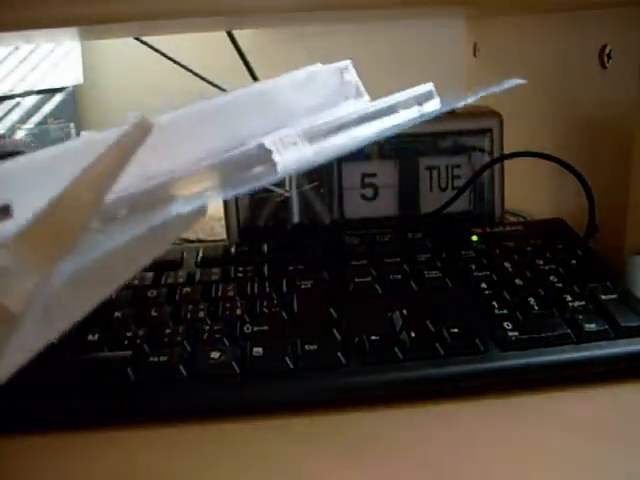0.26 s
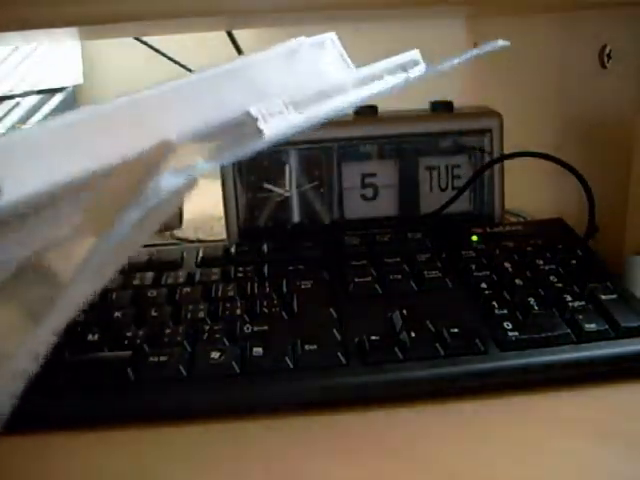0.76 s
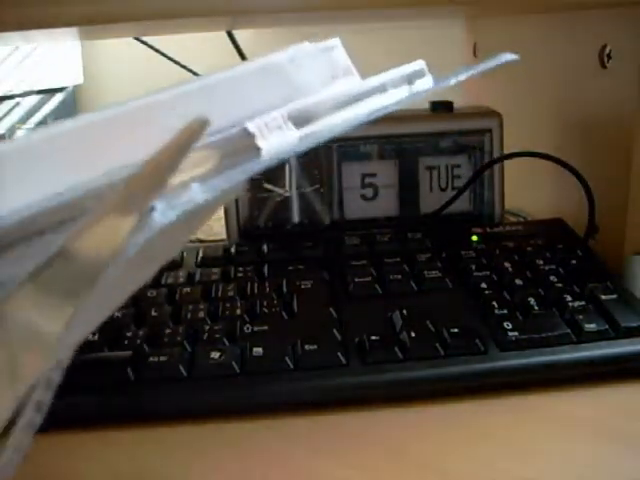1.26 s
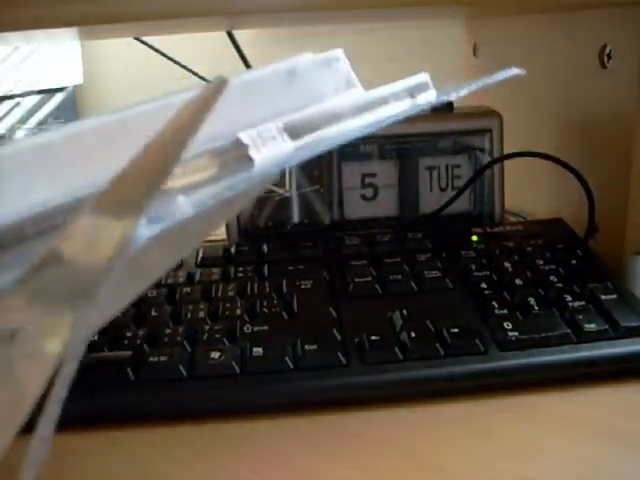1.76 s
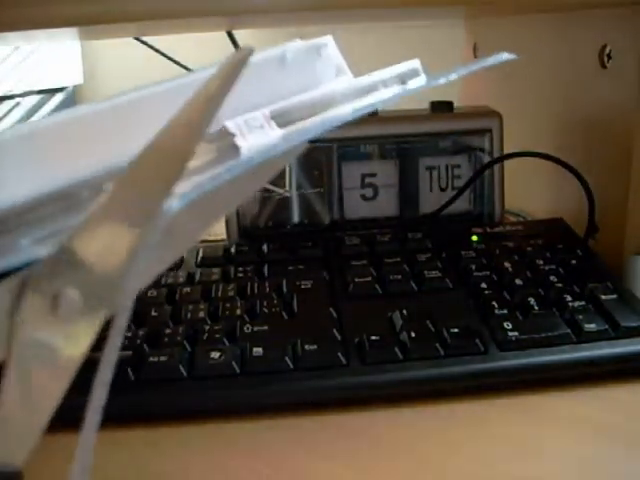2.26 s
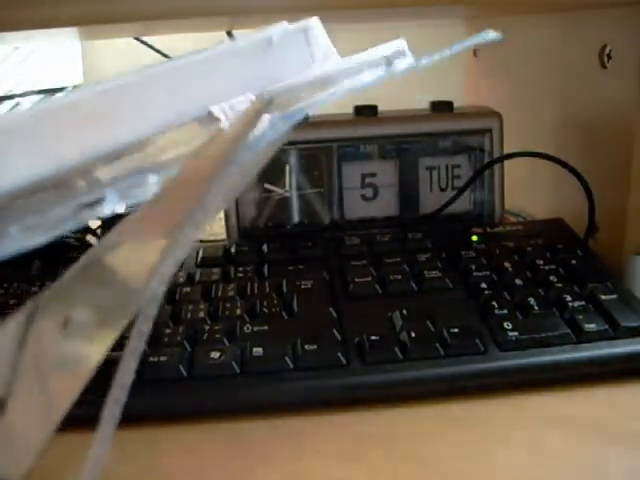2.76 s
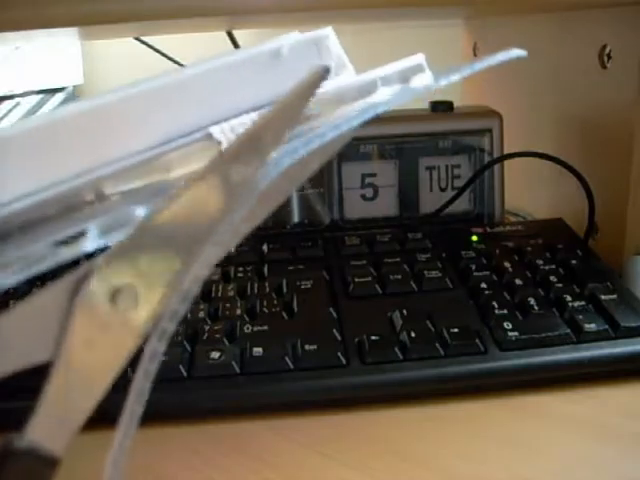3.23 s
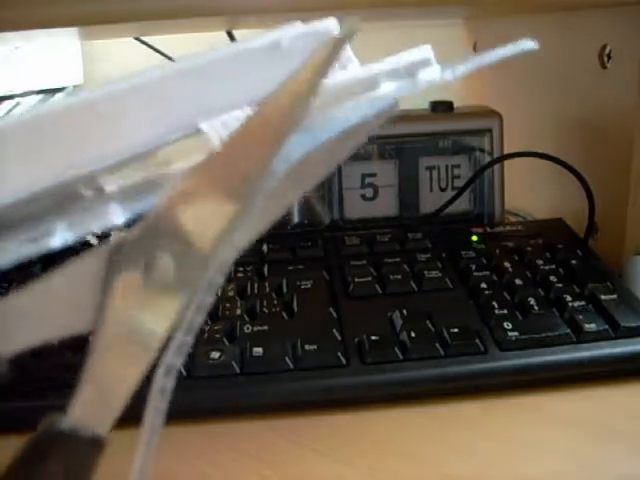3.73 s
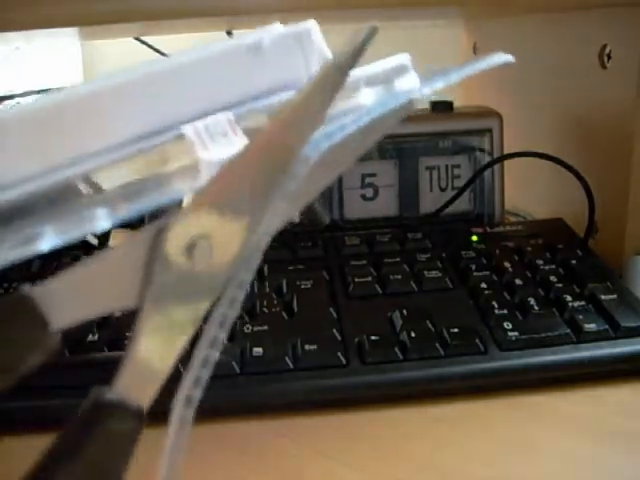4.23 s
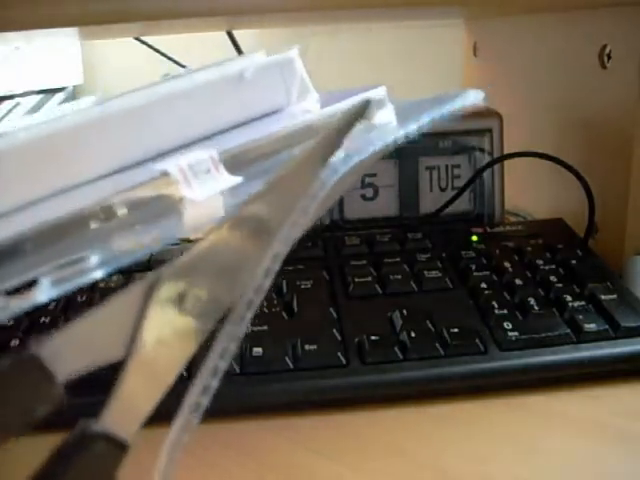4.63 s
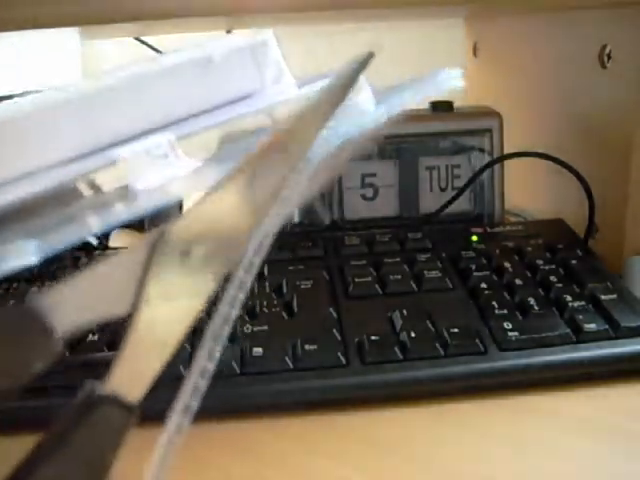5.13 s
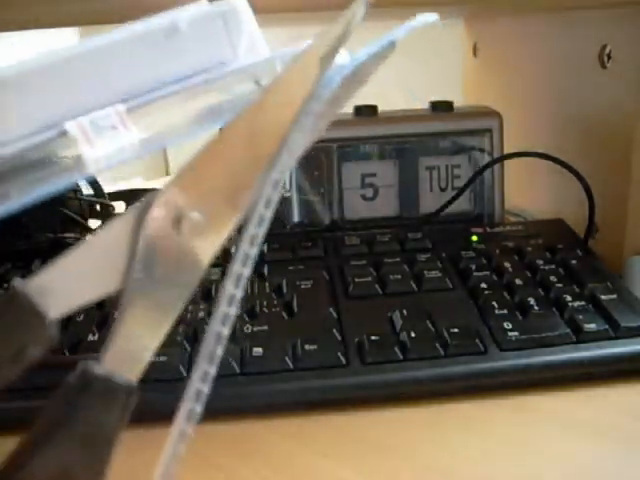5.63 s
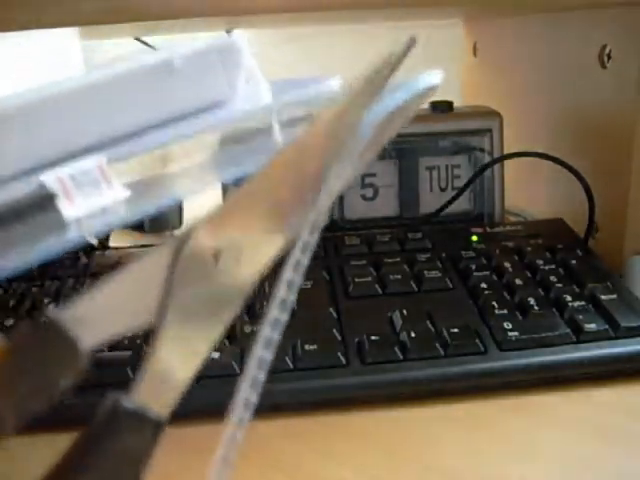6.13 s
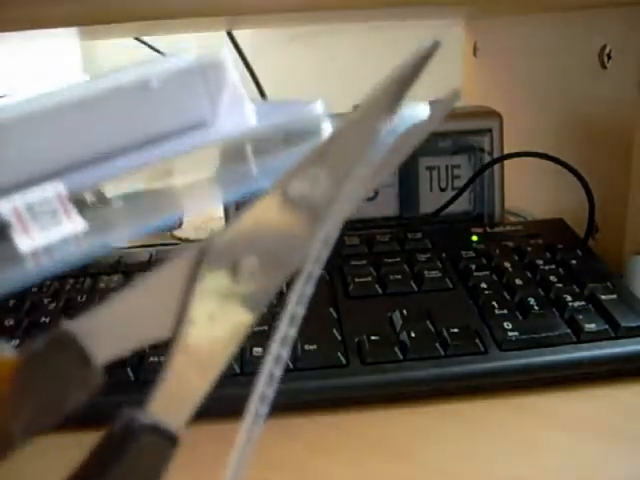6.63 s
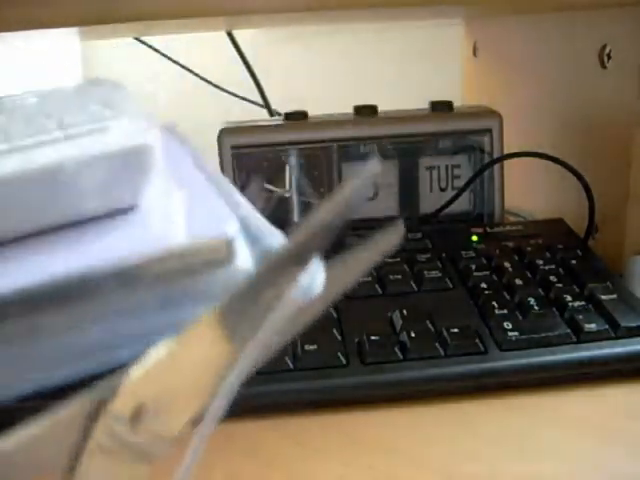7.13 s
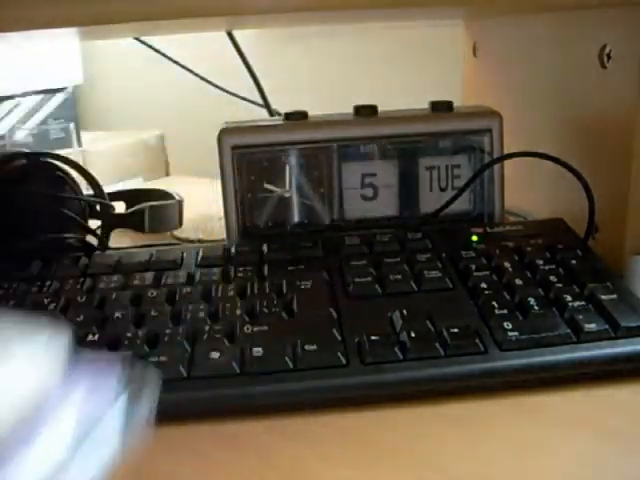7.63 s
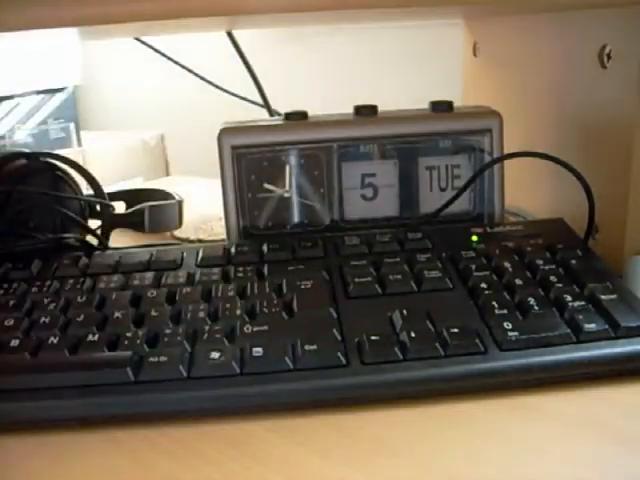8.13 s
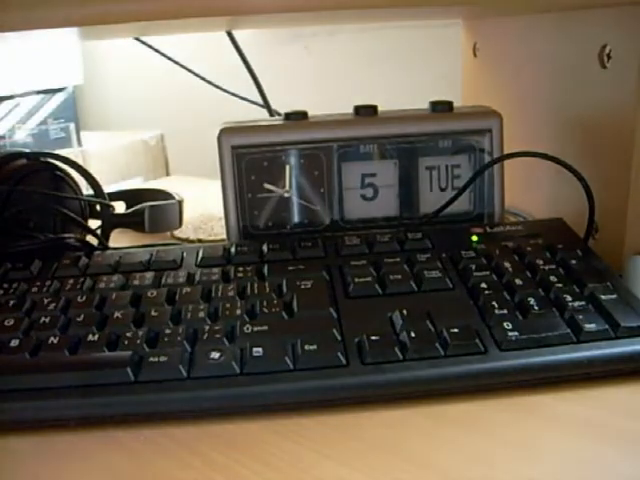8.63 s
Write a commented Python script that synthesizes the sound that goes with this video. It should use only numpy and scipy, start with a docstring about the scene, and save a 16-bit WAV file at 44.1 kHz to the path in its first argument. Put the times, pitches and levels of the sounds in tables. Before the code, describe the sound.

Scissors cut a stiff plastic blister pack close to a small webcam microphone, a bite about every half second. Each is a sharp, often doubled crack with brittle crunch, followed by a short rub and small snaps of bent plastic. Then pack and scissors are dropped on the desk with hard knocks, rattle and soft scrapes. A computer fan hums faintly in the small room.

```python
"""In a wooden desk nook, scissors bite their way through a stiff blister pack, close to a small webcam.
Each bite is a crunch of tiny random fractures with sharp snaps; every break ticks, rings the shell and fizzes.
At the end pack and scissors are put down and pushed aside: knocks, rattle and short scrapes.
A computer adds fan rush, hum and a faint whine. The microphone's port rings near 3 kHz; the hardest knocks
overload it."""
import sys
import numpy as np
from scipy import signal
from scipy.fft import rfft, irfft
from scipy.io import wavfile

SR = 44100
rng = np.random.default_rng(int(sys.argv[2]) if len(sys.argv) > 2 else 0)


def put_to_file(sound):
    """Save the sound as 16-bit audio at rate SR, in the file named by the first command-line argument."""
    columns = np.atleast_2d(sound).T  # one column per channel
    safe = np.clip(columns, -1, 1)
    whole_steps = np.round(safe * 32767)
    wavfile.write(sys.argv[1], SR, whole_steps.astype(np.int16))


N = 391608
TIME = np.arange(N) / SR


# the closing blades crack through the sheet, mostly twice a cut:
# [t/s, level/dB, brightness/dB, extra dry tick/dB, crunch around the crack/dB]
BLADE_CRACKS = [(0.0837, -40.5, 2, 1, 2), (0.6865, -37.5, -1.5, -0.5, -1), (0.7748, -40, 3, -2, -1),
                (1.3071, -45, -8, 3, 1.5), (1.3706, -40, 8.5, 2.5, 0.5), (1.9466, -44, 12.5, -2.5, 0.5),
                (1.9864, -44.5, 6, 3, 5.5), (2.6322, -31.5, 4, -5, -4), (2.6905, -31, 1.5, 0, -6.5),
                (3.2850, -33, 7, 1, 0.5), (3.3649, -45, 1.5, -4, 3.5), (3.8884, -37, 0, -1, 5),
                (3.9461, -45, 6, 1.5, 2.5), (4.4515, -36.5, 4, -5, 4.5), (4.5005, -44, 8, -3, 7),
                (4.9403, -45, 10.5, -2.5, 3), (4.9706, -35, 10.5, -3, -8), (4.9941, -37, 8.5, -1.5, -4),
                (5.4185, -48, 10, -6, -10), (5.4549, -38, 2.5, -1.5, 1.5), (5.5001, -46.5, 8.5, 0.5, -3),
                (5.9773, -38, 17, -0.5, -6), (6.0311, -44, 2.5, 2.5, -0.5), (6.4518, -46, -3, 4, 2),
                (6.4916, -34, -2, 5.5, -5.5), (6.7672, -43, 3, 0, -1.5)]
# the blades reopen and rub forward along the slit: [start t/s, length/s, level/dB]
BLADE_RUBS = [(0.281, 0.065, -46), (0.957, 0.061, -43), (1.589, 0.088, -49), (2.223, 0.074, -51.5),
              (2.485, 0.12, -55), (2.861, 0.099, -46.5), (3.63, 0.067, -51.5), (4.193, 0.044, -49),
              (4.728, 0.071, -48.5), (5.215, 0.081, -45.5), (5.721, 0.084, -51), (6.239, 0.12, -53),
              (6.904, 0.051, -54.5), (7.247, 0.043, -49.5)]
RUB_PEAK = 0.3  # a rub is hardest at this share of its length
# the bent pack snaps against the blades: [t/s, level/dB, brightness/dB]
PACK_SNAPS = [(0.0094, -48, -9.5), (0.2492, -51.5, 18.5), (0.2984, -41.5, -6), (0.3349, -41.5, -4),
              (0.4431, -51, -9), (0.5764, -56, 7), (0.7569, -54.5, 7), (0.833, -54, 1),
              (0.8986, -42.5, -1.5), (0.947, -41.5, 5), (0.9695, -45, -4), (1.0046, -39.5, 1),
              (1.0665, -49.5, -3), (1.1991, -56.5, 11), (1.6106, -40, 1.5), (1.6243, -39, 0),
              (1.6535, -45.5, -4), (1.6978, -50, -5), (1.8804, -54, 4), (2.0599, -50, 4),
              (2.1522, -60.5, -17), (2.2426, -43.5, 2), (2.2567, -45, -2), (2.2898, -48, -7.5),
              (2.3033, -49, 12), (2.3106, -48.5, 22), (2.5138, -51, -23.5), (2.548, -52.5, -8),
              (2.907, -41, 7), (2.9164, -40.5, -8), (2.9262, -43.5, -4), (2.9804, -48.5, -3),
              (2.9879, -44.5, 2), (3.4256, -56.5, 2), (3.6052, -58, 21), (3.6565, -44.5, -3),
              (3.689, -40.5, 2.5), (3.7323, -51.5, 1), (3.8955, -34, -13), (4.2522, -44.5, 2),
              (4.314, -53, 0), (4.4572, -35, 6.5), (4.7214, -51.5, 7), (4.7845, -43.5, -2.5),
              (4.8274, -47, -1), (4.8904, -57, 14), (5.2072, -51, 13), (5.2493, -43, -1),
              (5.4318, -42, -16), (5.6997, -46.5, 16), (5.7436, -41, 3), (5.7726, -47, -8),
              (5.938, -45, -18), (5.9644, -41, 13.5), (6.2436, -44, -2.5), (6.293, -44, 1),
              (6.3164, -35, 0), (6.4413, -45, 0), (6.4652, -44, -5), (6.7746, -37, 4), (6.8208, -46.5, 1),
              (7.0827, -55, 6.5), (7.2326, -40, -0.5), (7.2669, -43.5, -5), (7.2982, -44.5, -11),
              (7.5782, -60, 8)]
# ringing tones of the pack held in the hand: [f/Hz, level/dB]
HELD_PACK_MODES = [(185, -14), (260, -16.5), (390, -11.5), (505, -3.5), (590, -0.5), (715, 1.5), (820, 2),
                   (900, -1.5), (1030, -3.5), (1150, -1), (1300, 2), (1480, 2.5), (1630, -1), (1800, 0),
                   (1980, -1.5), (2150, 4), (2340, 1), (3450, -2.5), (3750, -10.5), (4300, -2.5)]


def cutting():
    """The blades close with a crack and a crunch, then reopen and rub forward while the bent pack snaps."""
    pack = shell_rings(HELD_PACK_MODES, t60_at_1khz_s=0.019, bend=0.062)
    cracks = clicks(BLADE_CRACKS, pack, per_s=5500, after_db=1.0, run_s=0.0016, build_up=0.52,
                    tick_db=1.5, ring_db=3.0, edge_db=5.0)
    crunch = crunches(bursts(BLADE_CRACKS, bright_share=0.43), pack, per_s=1400, spread_db=3.0,
                      tick_db=-14, ring_db=-4.5, edge_db=-9.0)
    rubs = crunches(strokes(BLADE_RUBS, RUB_PEAK), pack, per_s=950, spread_db=4.0,
                    tick_db=-4.5, ring_db=1.26, edge_db=3.0)
    # snaps have no extra dry tick and no crunch around them
    lone_snaps = [(*snap, 0, 0) for snap in [*PACK_SNAPS, *small_ticks(bright_spread_db=3.5)]]
    snaps = clicks(lone_snaps, pack, per_s=5500, after_db=-3.5, run_s=0.0016, build_up=0.59,
                   tick_db=0.5, ring_db=1.0, edge_db=3.0)
    return cracks + crunch + rubs + snaps


# ticks as the pack settles: time from the start of a rub, level against the rub, scatter
SETTLE_S, SETTLE_DB, SETTLE_SCATTER_DB = 0.13, -12.5, 1.5
# faint ticks of the pack in the hand: last moment, level, scatter
HANDLING_UNTIL_S, HANDLING_DB, HANDLING_SCATTER_DB = 7.7, -65, 3


def small_ticks(bright_spread_db, per_rub=3, handling_count=30):
    """Random weak snaps: a few as the pack settles with each rub, fainter ones from the holding hand."""
    ticks = []
    for start_s, _, rub_db in BLADE_RUBS:
        for share in rng.random(per_rub):
            tick_db = rub_db + SETTLE_DB + SETTLE_SCATTER_DB * rng.standard_normal()
            ticks.append((start_s + SETTLE_S * share, tick_db))
    for share in rng.random(handling_count):
        tick_db = HANDLING_DB + HANDLING_SCATTER_DB * rng.standard_normal()
        ticks.append((HANDLING_UNTIL_S * share, tick_db))
    return [(s, db, bright_spread_db * rng.standard_normal()) for s, db in ticks]


# pack and scissors knock on the desk:
# [t/s, level/dB, brightness/dB, extra dry tick/dB, rattle around the knock/dB]
DESK_KNOCKS = [(7.624, -54, 10, -11, -7), (7.7443, -50.5, 10, 5, -13), (7.765, -45.5, 0, 0, 0),
               (7.7845, -47.5, -10, 0, -18), (7.8572, -33, 7.5, -5.5, -14), (7.9545, -41.5, -10, -3, -3.5),
               (8.0099, -40, -1, -11, 2.5), (8.0478, -24.5, -5.5, -0.5, -8), (8.0545, -18, 4.5, -2, -12),
               (8.0643, -24, -8, 1, -11), (8.0879, -27, 2.5, 6, -21), (8.1254, -46, -14, -4, -20),
               (8.1457, -40.5, -6, 1.5, -15), (8.1746, -30.5, -15.5, 5.5, -5), (8.1818, -27, -16.5, -5, -7),
               (8.1877, -33, -10, 4.5, -12), (8.2179, -39, -6, 11.5, -21), (8.2884, -45.5, -5, -1, 0),
               (8.3384, -40.5, -6.5, 8.5, -28), (8.5443, -44.5, -10, -5, -13), (8.5547, -46, 1, 0.5, -16)]
# the pack slides over the desk: [start t/s, length/s, level/dB]
DESK_SCRAPES = [(7.69, 0.12, -49.5), (8.395, 0.082, -51), (8.51, 0.12, -51.5), (8.645, 0.2, -50.5),
                (8.72, 0.19, -49.5)]
SCRAPE_PEAK = 0.38  # a slide is hardest at this share of its length
# ringing tones of the pack lying on the desk: [f/Hz, level/dB]
LYING_PACK_MODES = [(80, -23.5), (170, -17.5), (245, -14.5), (345, -13.5), (485, -8.5), (655, -2),
                    (810, 1.5), (972, 1), (1085, 0), (1255, 2.5), (1400, 6), (1555, 1.5), (1695, 4),
                    (1850, -0.5), (2005, 2.5), (2125, 3.5), (2300, -8), (3525, 0.5), (3950, -1)]


def putting_down():
    """Pack and scissors land on the desk, rattle and slide."""
    pack = shell_rings(LYING_PACK_MODES, t60_at_1khz_s=0.023, bend=0.027)
    knocks = clicks(DESK_KNOCKS, pack, per_s=4000, after_db=-4, run_s=0.0015, build_up=0.72,
                    tick_db=2.0, ring_db=-0.5, edge_db=-4.5)
    rattle = crunches(bursts(DESK_KNOCKS, bright_share=0.37), pack, per_s=1100, spread_db=0.5,
                      tick_db=-11, ring_db=2.5, edge_db=-4)
    scrapes = crunches(strokes(DESK_SCRAPES, SCRAPE_PEAK), pack, per_s=1300, spread_db=3.0,
                       tick_db=-6.5, ring_db=1.0, edge_db=-5.0)
    return knocks + rattle + scrapes


# treble of a clean break: [f/Hz, level/dB]
BREAK_TREBLE = [(1500, -36.5), (3000, -0.5), (4200, 2.5), (5500, 5.5), (7000, 1.5), (9000, 5), (11000, 0.5),
                (14000, -11.5)]
# the less crunch or rattle around a hit, the shorter its run of small breaks: share of that level it follows
RUN_FOLLOWS = 0.36


def clicks(table, rings, per_s, after_db, run_s, build_up, tick_db, ring_db, edge_db, size=750):
    """Small breaks build up to a sharp one and trail off after it."""
    out = np.zeros(N)
    lead = size // 5  # samples before the sharp break
    t = (np.arange(size) - lead) / SR
    for s, db, bright_db, dry_db, burst_db in table:
        # the build-up is shorter than the trail
        reach_s = run_s * from_db(RUN_FOLLOWS * burst_db) * np.where(t < 0, build_up, 1)
        small_breaks = fractures(size, per_s, spread_db=0.0) * np.exp(-np.abs(t) / reach_s)
        force = from_db(after_db) * small_breaks
        force[lead] = 1  # the sharp break itself
        levels_db = voiced(db, bright_db, (tick_db + dry_db, ring_db, edge_db))
        add(out, s + t[0], radiate(force, rings, BREAK_TREBLE, levels_db, length_s=0.0042))
    return out


# treble of a slow crunch: [f/Hz, level/dB]
CRUNCH_TREBLE = [(1500, -25), (3000, -2), (4200, -2.5), (5500, -2), (7000, -3.5), (9000, -8.5),
                 (11000, -10), (14000, -19)]


def crunches(spans, rings, per_s, spread_db, tick_db, ring_db, edge_db):
    """A dense run of tiny breaks and slips that swells with the pressure and dies away."""
    out = np.zeros(N)
    for start, hardest, end, db, bright_db in spans:
        count = np.clip(int((end - start) * SR), 2, SR // 4)
        t = start + np.arange(count) / SR
        pressure = np.interp(t, [start, hardest, end], [0, 1, 0]) ** 0.49
        force = pressure * fractures(count, per_s, spread_db)
        levels_db = voiced(db, bright_db, (tick_db, ring_db, edge_db))
        full_pressure_s = np.sum(pressure ** 2) / SR  # a steady crunch this long has the same energy
        add(out, start, radiate(force, rings, CRUNCH_TREBLE, levels_db, full_pressure_s))
    return out


# a hit sits in a short burst of small breaks: swell before it, fade after it
BURST_SWELL_S, BURST_FADE_S = 0.006, 0.024


def bursts(hits, bright_share):
    """The span of crunching around each hit; it takes on a share of the hit's brightness."""
    return [(s - BURST_SWELL_S, s, s + BURST_FADE_S, db + burst_db, bright_share * bright_db)
            for s, db, bright_db, _, burst_db in hits]


def strokes(table, peak):
    """The span of each sliding movement: pressure rises to a peak and falls."""
    return [(start, start + peak * length, start + length, db, 0) for start, length, db in table]


def fractures(count, per_s, spread_db):
    """Tiny clicks at random moments, per_s on average, most weak and a few strong."""
    sizes = from_db(spread_db * np.minimum(rng.exponential(1, count), 4))
    happens = rng.random(count) < per_s / SR
    return happens * sizes * rng.choice([-1, 1], count)


# gain per dB of brightness; a sharp break is all edge, a blunt one all ring: [tick, shell ring, bright edge; dB/dB]
BRIGHTNESS_TILT = (0.31, -0.48, 0.67)


def voiced(db, bright_db, balance_db):
    """Levels of tick, shell ring and bright edge for a contact of this strength and brightness."""
    return db + np.array(balance_db) + bright_db * np.array(BRIGHTNESS_TILT)


def radiate(force, rings, treble, levels_db, length_s, count=5):
    """A force on the plastic gives a tick, a ring of the whole shell and a bright edge."""
    force = np.pad(force, (0, rings.shape[1]))
    tick = band(force, 2312, 3266)
    # successive moments of force fall on different spots, so the shell's colour keeps changing
    spots = rings[rng.permutation(len(rings))[:count]]
    dealt = force * (np.arange(len(force)) % count == np.arange(count)[:, None])
    shell = signal.fftconvolve(dealt, spots, axes=1).sum(axis=0)[:len(force)]
    edge = coloured(force, treble, size=512)
    parts = zip(levels_db, (tick, shell, edge))
    return np.sqrt(length_s * SR) * sum(from_db(db) * unit_energy(part) for db, part in parts)


def shell_rings(modes, t60_at_1khz_s, bend, count=40, size=2400):
    """Rings of a plastic shell for many spots and grips: bending shifts the modes, each spot weighs them anew."""
    hz, db = np.transpose(modes)
    shift, strength, side = rng.standard_normal((3, count, len(hz), 1))
    t = np.arange(size) / SR
    lives_s = t60_at_1khz_s * np.sqrt(1000 / hz)  # high tones die sooner
    decay = from_db(db[:, None] - 60 * np.outer(1 / lives_s, t))
    swing = np.cos(2 * np.pi * hz[:, None] * np.exp(bend * shift) * t)
    weight = np.sign(side) * from_db(2 * strength)
    return np.sum(weight * decay * swing, axis=1)


# colour of the reflections: [f/Hz, level/dB]
WALL_COLOUR = [(100, 1), (500, -2.5), (1000, -2), (2000, -2.5), (2900, -2.5), (5000, -6), (10000, -8.5)]


def room(x, nook_db, nook_t60, room_db, room_t60, size=26000):
    """Quick reflections from the desk nook and the tail of a small room, as fading noise (t60 in s)."""
    t = np.arange(size) / SR
    near, far = rng.standard_normal((2, size))
    nook = unit_energy(near * (t > .0025) * from_db(-60 * t / nook_t60))
    tail = unit_energy(far * (t > .008) * from_db(-60 * t / room_t60))
    reflections = from_db(nook_db) * nook + from_db(room_db) * tail
    return signal.fftconvolve(x, coloured(reflections, WALL_COLOUR))[:N]


# colour of the computer fan, before its overall level is set: [f/Hz, level/dB]
FAN_COLOUR = [(25, -5), (70, -5.5), (130, -6), (215, 2.5), (310, -8.5), (500, 1.5), (780, -8.5), (1500, -9),
              (2600, -10.5), (4000, -15.5), (9000, -32.5)]


def computer(fan_db, hum_hz, hum_db, whine_hz, whine_db):
    """Fan rush as coloured noise, mains hum as a sine and a faint whine whose phase wanders."""
    fan = np.sqrt(N) * unit_energy(coloured(rng.standard_normal(N), FAN_COLOUR))
    hum = np.sqrt(2) * np.sin(2 * np.pi * hum_hz * TIME)
    wander = np.cumsum(rng.standard_normal(N)) * 0.021  # radians
    whine = np.sqrt(2) * np.sin(2 * np.pi * whine_hz * TIME + wander)
    return from_db(fan_db) * fan + from_db(hum_db) * hum + from_db(whine_db) * whine


def from_db(db):
    """Decibels to gain."""
    return 10 ** (np.asarray(db) / 20)


def unit_energy(x):
    """The same shape with a sum of squares of one."""
    return x / np.sqrt(np.sum(x ** 2) + 1e-20)


def add(track, start_s, sound):
    """Mix a sound into a track."""
    at = int(np.clip(round(start_s * SR), 0, N - 1))
    track[at:at + len(sound)] += sound[:N - at]


def band(x, low_hz, high_hz, order=2):
    """Keep one band of pitches; the filter responds only after its input."""
    b, a = signal.butter(order, [low_hz, high_hz], "band", fs=SR)
    return signal.lfilter(b, a, x)


def coloured(x, spectrum, size=4096):
    """Minimum-phase filter through (f/Hz, level/dB) points: it rings only after a click."""
    hz, db = np.transpose(spectrum)
    grid_hz = np.maximum(np.arange(size // 2 + 1) * SR / size, 1)
    gain = from_db(np.interp(np.log(grid_hz), np.log(hz), db))
    cepstrum = irfft(np.log(gain))
    # folding the cepstrum forward puts all the ringing after the click
    fold = np.r_[1, np.full(size // 2 - 1, 2), np.zeros(size // 2)]
    response = irfft(np.exp(rfft(cepstrum * fold)))
    return signal.fftconvolve(x, response)[:len(x)]


def scene():
    """Everything that reaches the microphone; the pack is put down closer than it is cut, so it echoes less."""
    cuts, landing = cutting(), putting_down()
    cut_echoes = room(cuts, nook_db=-12, nook_t60=0.062, room_db=-8.5, room_t60=0.24)
    landing_echoes = room(landing, nook_db=-17.0, nook_t60=0.027, room_db=-10.5, room_t60=0.2)
    machine = computer(fan_db=-64.0, hum_hz=120, hum_db=-67.0, whine_hz=2640, whine_db=-80.5)
    return (cuts + landing + cut_echoes + landing_echoes + machine)[None]


# response of the microphone behind its port: [f/Hz, level/dB]
MICROPHONE_RESPONSE = [(100, -1.5), (1000, 0.5), (2000, 3), (2400, 5), (2850, 14), (3200, 8), (3600, 3.5),
                       (4200, -3), (6200, -13), (10000, -23)]
CUTOFF_HZ = 10800


def record(dry, hiss_db=-70):
    """The port rings, the preamplifier hisses and clips, the top is cut."""
    heard = coloured(dry[0], MICROPHONE_RESPONSE) + from_db(hiss_db) * rng.standard_normal(N)
    clipped = np.clip(heard, -.76, .76)
    top_cut = signal.ellip(10, .1, 70, CUTOFF_HZ, fs=SR, output="sos")
    return signal.sosfilt(top_cut, clipped)[None]


dry = scene()
out = record(dry)
put_to_file(out)
```